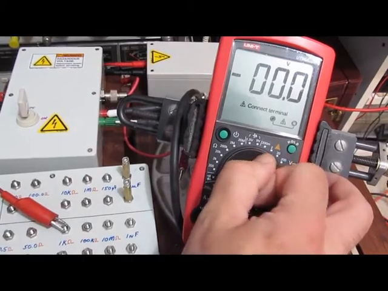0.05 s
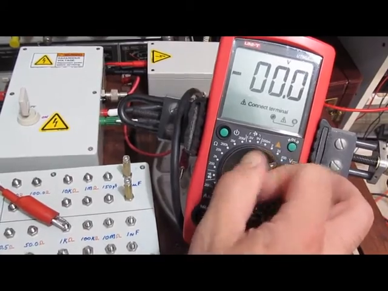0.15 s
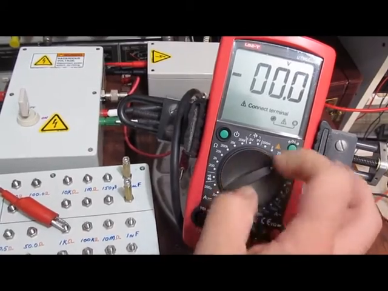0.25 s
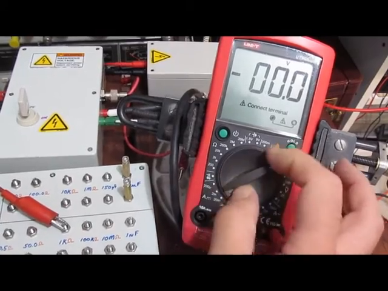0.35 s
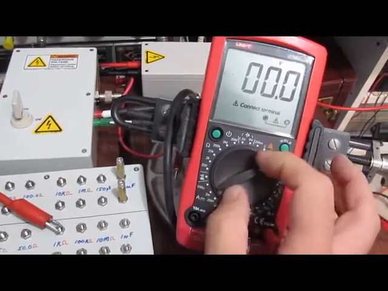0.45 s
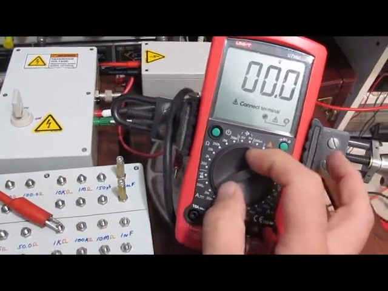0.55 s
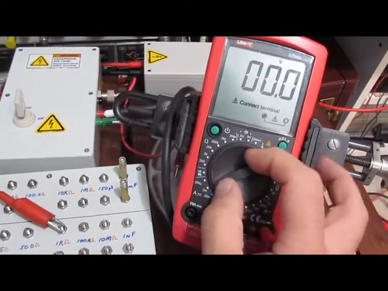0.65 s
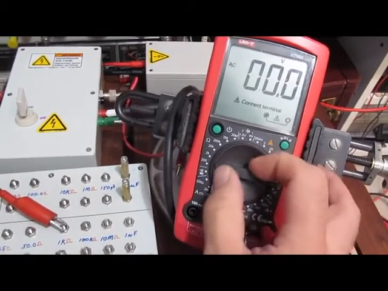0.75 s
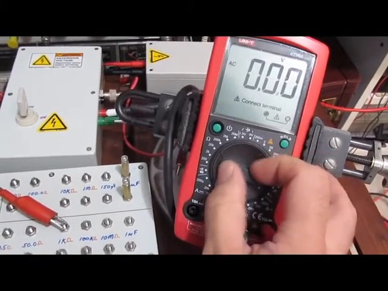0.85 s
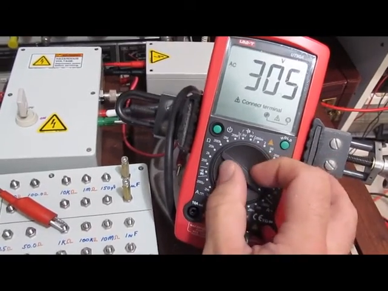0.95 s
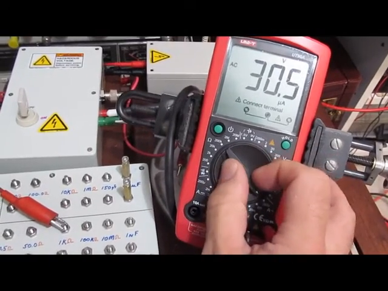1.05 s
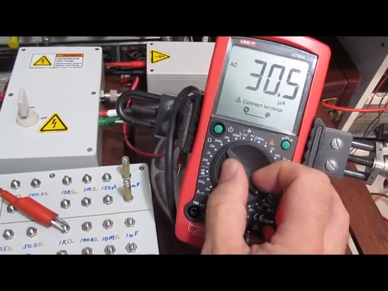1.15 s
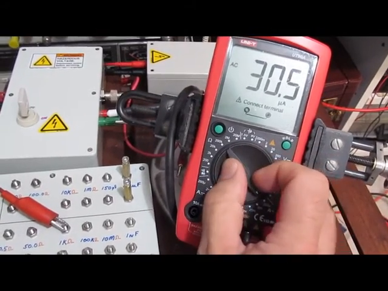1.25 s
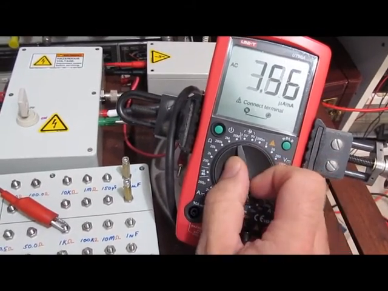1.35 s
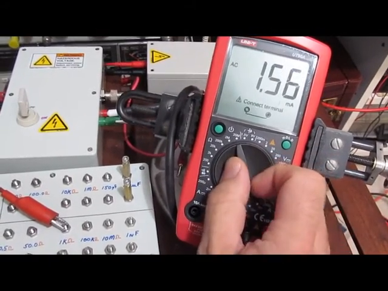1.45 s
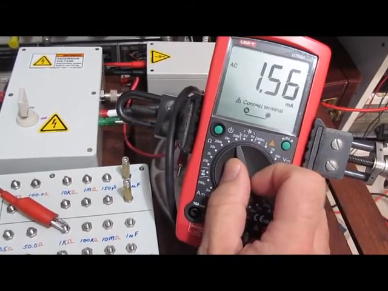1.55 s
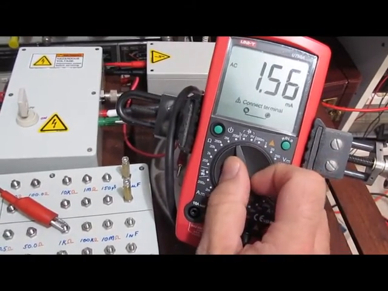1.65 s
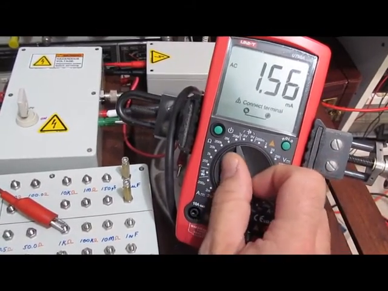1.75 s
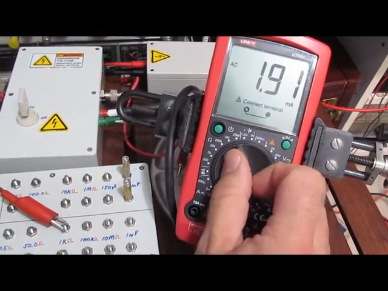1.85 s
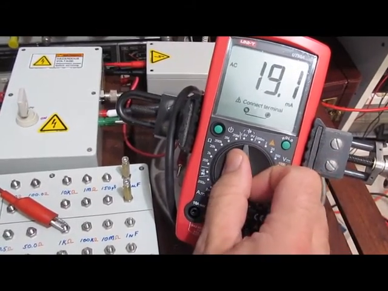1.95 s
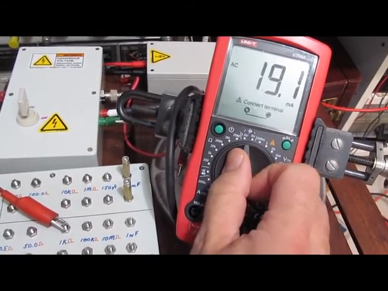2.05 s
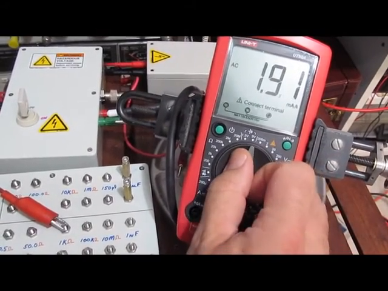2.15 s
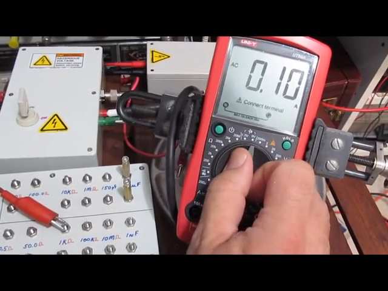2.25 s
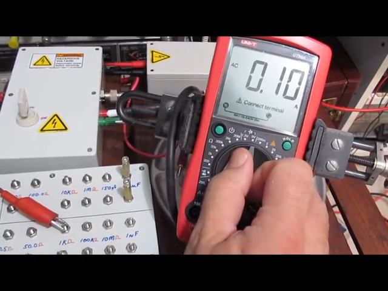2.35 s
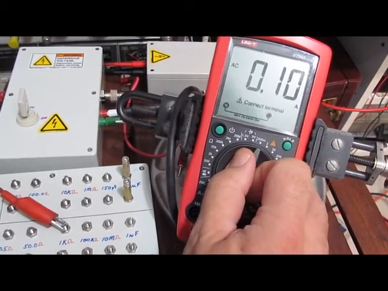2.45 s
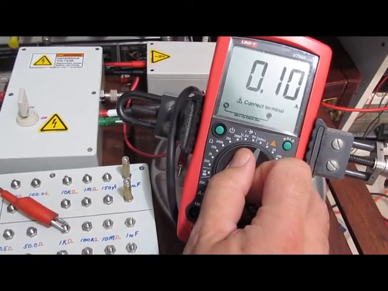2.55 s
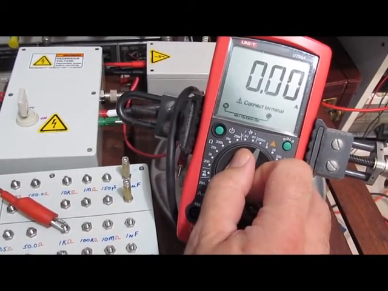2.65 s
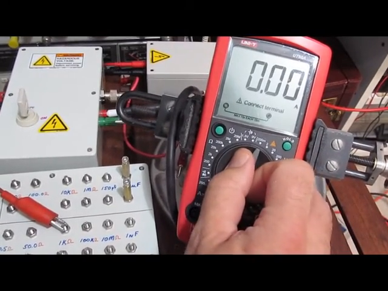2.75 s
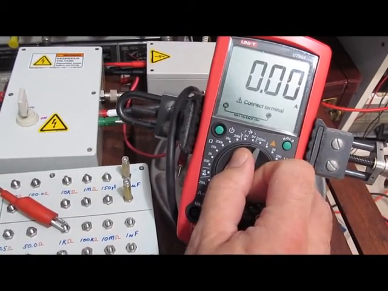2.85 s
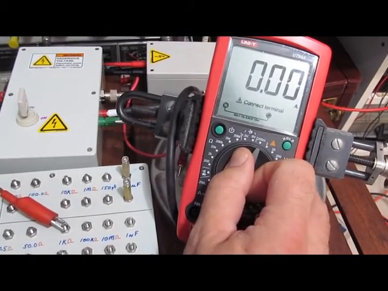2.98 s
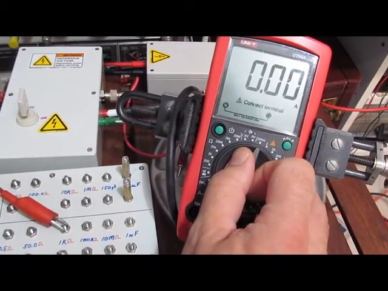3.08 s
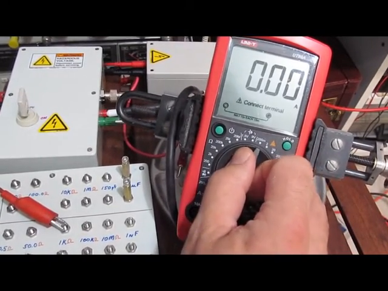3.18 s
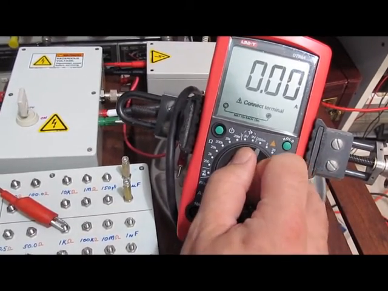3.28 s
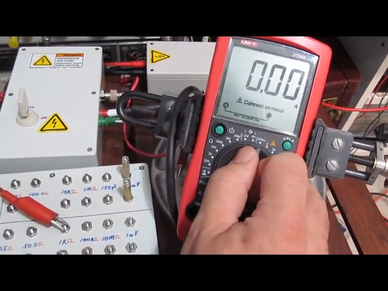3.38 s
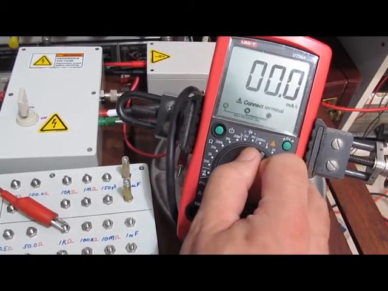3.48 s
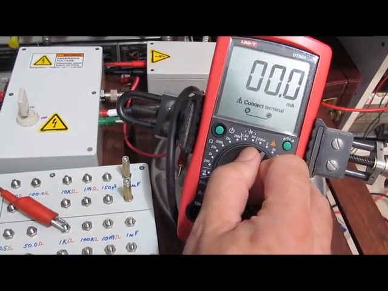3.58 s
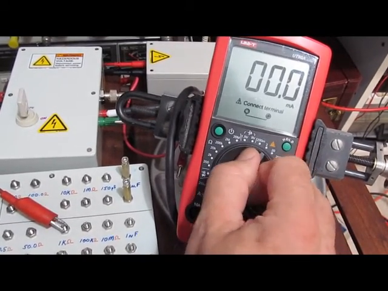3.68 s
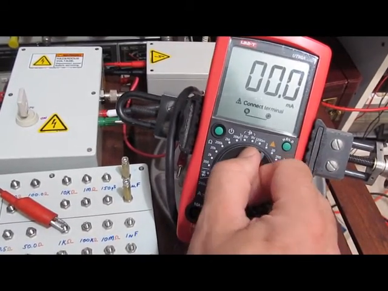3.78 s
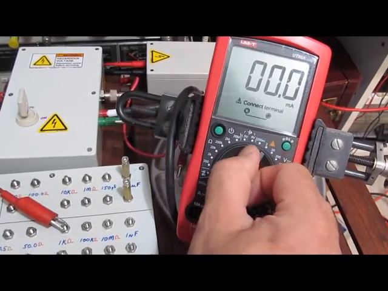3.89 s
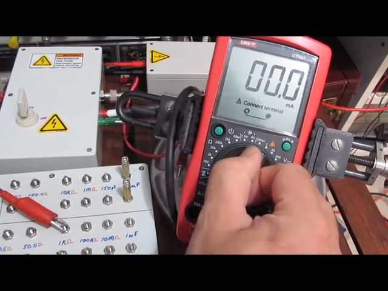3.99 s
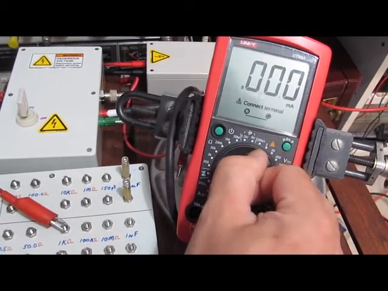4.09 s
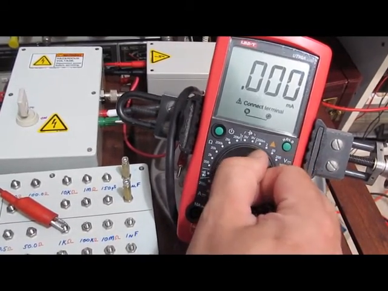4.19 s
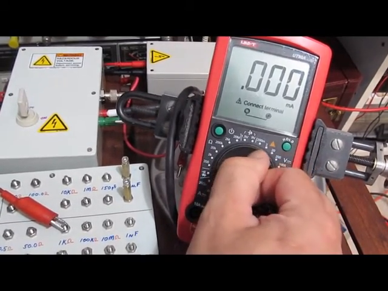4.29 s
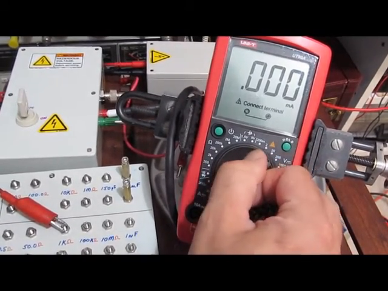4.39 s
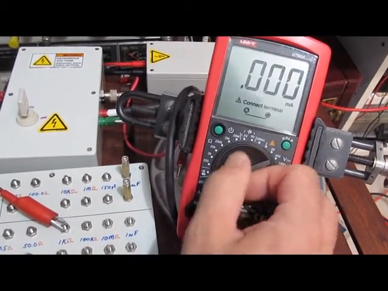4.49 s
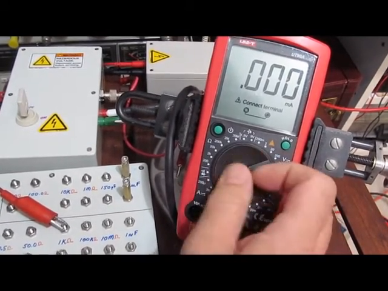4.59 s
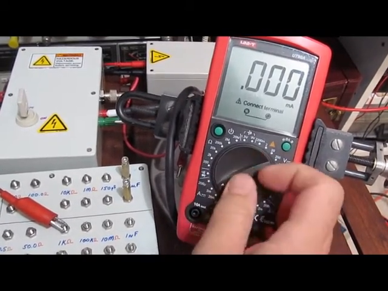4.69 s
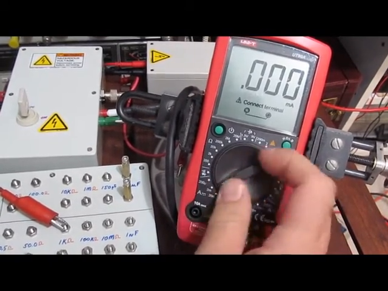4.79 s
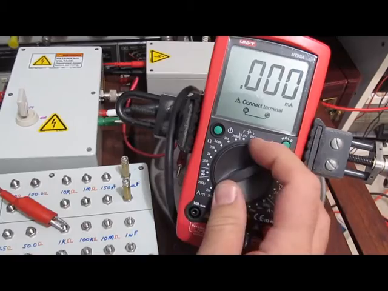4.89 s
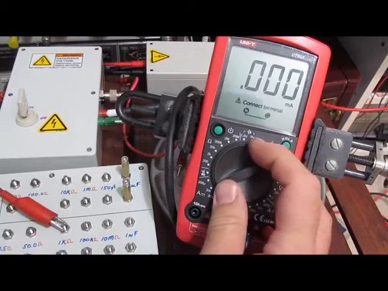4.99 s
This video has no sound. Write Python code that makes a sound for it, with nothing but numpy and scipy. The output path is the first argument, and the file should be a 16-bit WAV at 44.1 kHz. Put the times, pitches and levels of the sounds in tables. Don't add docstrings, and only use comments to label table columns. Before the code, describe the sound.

Sharp, hard plastic clicks as a hand turns a meter's rotary selector through its detents, unevenly spaced, over a faint steady fan hum.

```python
import sys
import numpy as np
from scipy import signal
from scipy.fft import rfft, irfft, next_fast_len
from scipy.io import wavfile
from scipy.ndimage import uniform_filter1d

SR = 44100
rng = np.random.default_rng(int(sys.argv[2]) if len(sys.argv) > 2 else 0)


def unload_wav(signal):
    wavfile.write(
        sys.argv[1],
        SR,
        np.round(np.clip(np.atleast_2d(signal).T, -1, 1) * 32767).astype(np.int16),
    )


def level_to_linear(level):
    exponent = np.asarray(level, float) / 20
    return 10 ** exponent


N = 221818

# blow in seconds, blow level in dB, main ring in Hz,
# gap to the first rebound in seconds, case rattle under the ring in dB.
DETENTS = [(.0033, -2.5, 4277, .0017, -17.5), (0.7555, -2, 4562, .0009, -11.5),
           (0.7612, -8.5, 4400, .0012, -11), (.7710, -7.5, 4138, 0.0014, -13),
           (.9180, -6.5, 4283, 0.0014, -10), (0.9465, -9, 5620, .0014, -7),
           (1.1155, -4, 4581, .0016, -10.5), (1.3683, -2, 3990, .0010, -12.5),
           (1.3961, -10.5, 5086, .0013, -8), (1.9541, -1.5, 4180, 0.00083, -15),
           (2.1880, -3, 4030, 0.001, -12.5), (2.5258, -0.5, 4150, .0010, -16.5),
           (3.5032, -2, 4330, .0010, -18.5), (4.0893, 0.5, 4453, .0010, -22.5),
           (4.1749, -12, 4272, 0.0014, -24), (4.1789, -14.5, 4272, 0.0011, -25.5)]
USUAL_RATTLE_DB = -13
RING_S = 0.06


def shape(x, points):
    hz, db = np.transpose(points)
    size = next_fast_len(x.shape[-1], real=True)
    log_hz = np.log(np.arange(size // 2 + 1) * SR / size + 1)
    gain = level_to_linear(np.interp(log_hz, np.log(hz), db))
    return irfft(rfft(x, size) * gain, size)[..., :x.shape[-1]]


def walk(rate):
    hold = int(SR / rate)
    steps = np.repeat(rng.standard_normal(N // hold + 1), hold)
    return 1.3 * uniform_filter1d(uniform_filter1d(steps, hold), hold)[:N]


def ring(hz, t60, db, late=0., push=0.00017):
    t = np.arange(int(SR * RING_S))[:, None] / SR
    fade = 1000. ** (-t / np.maximum(t60, .002))
    onset = 1 - np.exp(-(t / push) ** 2)
    return np.sum(level_to_linear(db) * np.sin(2 * np.pi * hz * (t + late)) * fade * onset, axis=1)


def add(out, s, sound):
    i = max(int(s * SR), 0)
    out[i:i + len(sound)] += sound[:N - i]


def contacts(s, db, gap, luck):
    k = np.arange(len(luck))
    rebound_s = s + gap * np.cumsum(1.15 ** k)
    rebound_db = db - 2.5 - 5.5 * k + 0.5 * luck
    tick = (s - 0.0017, db - 16)
    return [tick, (s, db), *zip(rebound_s, rebound_db)]


def dial():
    # Hz, t60 in seconds, dB.
    knock_modes = [(134.26, 0.021, -7.5), (228, .03, -6), (430, 0.014, -6.5), (620, 0.026, -2),
                   (907.2, .015, 1.5), (1000, 0.013, 0.5)]
    body_modes = [(1416, 0.011, -9), (1536, .01, -6.5), (1900, 0.0039, -5.5), (2042, 0.011, -2.5),
                  (2450, 0.009, -6.5), (2920, 0.0062, 5.5), (3350, 0.0021, 10.5)]
    edge_modes = [(4710, .006, 1), (5660, 0.0042, -2.5), (6320, 0.0069, -2), (7160, 0.0032, -2.5),
                  (6570, 0.004, -8), (7640, .006, -6.5), (8340, 0.0086, -4), (9180, .006, -2.5),
                  (10000, 0.003, -2), (10800, .005, -6), (11500, 0.003, -6)]
    # lower Hz, lower dB, upper Hz, upper dB, extra body level in dB.
    side_rings = [(3122, -4, 4700, -3.5, -0.5), (1460, -5.5, 2200, -6, 2.5), (2492, -3.5, 6200, -2, 0),
                  (2583, -12.5, 5800, -8.5, -5.5), (2770, -3.5, 5556, -4, 0), (2800, 3.5, 3800, 2.5, -4),
                  (3100, -14, 4200, -5, -2.5), (3040, -6.5, 6500, -5.5, -6), (3154, 3.5, 1400, -7, -2.5),
                  (3290, -11.5, 6100, -8.5, -1.5), (3148, -6, 4300, -4, -6.5), (2700, -7, 4700, -6.5, -5),
                  (3316, -1.5, 3900, -15, -3.5), (3460, -4.5, 2900, -13.5, -1),
                  (3130, -16, 4654, -2.5, -7.5), (3300, -13.5, 3900, -8, 3.5)]
    detune, scatter_db = 0.02, 1.0
    crack_db, crack_s = -0.5, 0.0023
    side_db, side_ring_db = -13, -4.5
    light_knock_db = -8.5
    slip = 0.85
    rebounds = 4
    hz, t60, db = np.transpose(knock_modes + body_modes + edge_modes)
    sizes = [len(knock_modes), len(body_modes), len(edge_modes)]
    push = np.repeat([.0015, .0004, .0003], sizes)
    damp = np.array([1, .55, .65])
    follows = np.array([.9, 0.85, 1])
    t = np.arange(int(SR * RING_S)) / SR
    crack_fade = t / crack_s * np.exp(-2.2 * t / crack_s)
    chance = rng.standard_normal((len(DETENTS), rebounds + 2, 2, 3, len(hz)))
    grit = rng.standard_normal((len(DETENTS), rebounds + 2, 2, len(t)))
    out = np.zeros((7, N))
    for detent, sides, spots, grains in zip(DETENTS, side_rings, chance, grit):
        start, blow_db, main_hz, gap, rattle_db = detent
        lower_hz, lower_db, upper_hz, upper_db, body_db = sides
        extra_rattle = rattle_db - USUAL_RATTLE_DB
        rings_hz = np.array([main_hz, lower_hz, upper_hz])
        rings_db = np.array([-1.5, lower_db, upper_db])
        rings_t60 = 0.0075 * (1 + 0.0137 * extra_rattle)
        parts_db = np.array([-26.5, -14.5 + body_db, -9]) + follows * extra_rattle
        hits = contacts(start, blow_db, gap, spots[2:, 1, 0, 0])
        for (s, hit_db), ports, noise in zip(hits, spots, grains):
            late = s - start + slip / damp * ports[0, 2, :3] / (2 * np.pi * rings_hz)
            lighter_db = [light_knock_db * (s != start), 0, 0]
            for k, (strength, tuning, sign) in enumerate(ports):
                modes_db = db + scatter_db * strength + np.repeat(parts_db + lighter_db, sizes)
                modes_hz = hz * (1 + detune * tuning)
                case = ring(modes_hz * np.sign(sign), t60, modes_db, push=push)
                quarter_turn = k / (4 * rings_hz)
                main = ring(rings_hz, rings_t60 * damp, rings_db + side_ring_db * k, late=late + quarter_turn)
                crack = level_to_linear(parts_db[2] + crack_db) * np.diff(noise[k], prepend=0) * crack_fade
                add(out[k], s, level_to_linear(hit_db + k * side_db) * (case + crack + main))
            if s == start:
                around_t60 = rings_t60 * 1.2 * np.sqrt(damp)
                around_db = rings_db + [0, -4, 0]
                around = [ring(*mode) for mode in zip(rings_hz, around_t60, around_db)]
                case = ring(modes_hz * (-1) ** np.arange(len(hz)), t60, modes_db, push=push)
                around += [level_to_linear(1) * case, level_to_linear(3) * crack]
                for row, part in zip(out[2:], around):
                    add(row, s, level_to_linear(hit_db + 3.5) * part)
    return out


def climb():
    climb_db, rise_s = -30, 0.0026
    grind_colour = [(800, -19.5), (2500, -3.5), (4300, 0.0), (9000, -7.5), (13000, -12.0)]  # (Hz, dB)
    t = np.arange(-SR // 100, 0) / SR
    grit = shape(rng.standard_normal((len(DETENTS), len(t))), grind_colour)
    out = np.zeros(N)
    for (s, blow_db, *_), noise in zip(DETENTS[1:], grit[1:]):
        add(out, s + t[0], level_to_linear(blow_db + climb_db) * noise * np.exp(t / rise_s))
    return out


def fingers():
    # start in seconds, level in dB, case mode in Hz, scrape in dB, knock in dB.
    taps = [
        (0.106, -42.5, 790, -11, -20.5),
        (0.242, -23.5, 607, -14.5, -4.5),
        (0.255, -29.5, 598, -19, 4),
        (0.263, -39.5, 704, -9, -5.5),
        (0.421, -38, 916, -19.5, -0.5),
        (0.45, -38, 1200, -21, -3),
        (1.481, -51, 590, -13, 7.5),
        (4.64, -35, 657, -21, -0.5),
    ]
    # Hz, dB.
    scrape_colour = [(100, -18), (300, 2), (900, 13.5), (2400, -4), (4300, -5.5), (5200, -11.5),
                     (8500, -15.5), (12000, -30)]
    # start in seconds, level in dB, pitch in Hz.
    creaks = [(0.1396, -50, 4570), (0.174, -53, 4280), (0.243, -40, 4300), (0.2614, -41, 4380),
              (0.3614, -60, 3950), (0.638, -58, 3217), (1.481, -42, 4240), (1.8995, -55, 4280),
              (4.654, -59, 4220)]
    scrape_s, lag_s = .004, 0.0018
    t = np.arange(int(SR * RING_S)) / SR
    grit = shape(rng.standard_normal((len(taps), len(t))), scrape_colour)
    out = np.zeros(N)
    for (s, db, hz, scrape_db, knock_db), noise in zip(taps, grit):
        knock = ring(hz * np.array([1, 2.85]), 0.01665, knock_db + np.array([0, -14]))
        slide = t / scrape_s
        scrape = level_to_linear(scrape_db + 15.0) * noise * np.sqrt(slide) * np.exp(-slide)
        add(out, s + lag_s, level_to_linear(db) * (knock + scrape))
    for s, db, hz in creaks:
        add(out, s, ring(hz * np.array([1, 1.1]), .02, db + np.array([-3, -9])))
    return out


def bench_echoes(mid):
    # delay in seconds, level in dB.
    echo_paths = [(.0105, -25), (.0225, -34)]
    return sum(level_to_linear(db) * np.roll(mid, int(s * SR)) for s, db in echo_paths)


def room(parts):
    # centre in Hz, t60 in seconds, level in dB.
    room_bands = [(537.6, 0.14, -45), (1200, 0.36, -45), (2100, 0.18, -38.5), (3100, 0.26, -48.5),
                  (4500, 0.26, -48.5), (6270, 0.22, -46), (9004, 0.13, -42), (12960, 0.15, -41)]
    build_s, wide = 0.0037, 0.73
    t = np.arange(SR // 2) / SR
    tail = 0
    for hz, t60, db in room_bands:
        band_pass = [(hz / 1.7, -30), (hz / 1.15, 0), (hz * 1.15, 0), (hz * 1.7, -30)]
        band = shape(rng.standard_normal((2, len(parts), len(t))), band_pass)
        tail = tail + level_to_linear(db) * band * 1000. ** (-t / t60)
    tail = tail * (1 - np.exp(-(t / build_s) ** 2))
    pair = np.array([tail[0] + wide * tail[1], tail[0] - wide * tail[1]])
    return signal.fftconvolve(parts[None], pair, axes=2).sum(axis=1)[:, :N]


def duck():
    recover_s = .6
    t = np.arange(N) / SR
    drops_db = [(8.5 + .4 * db) * np.exp(-np.abs(t - s) / recover_s) * (t > s) for s, db, *_ in DETENTS]
    return -49 - 1.03 * t - np.max(drops_db, axis=0)


def air():
    # Hz, level in dB per Hz.
    air_colour = [(12, -51), (20, -22.5), (91, -3), (107, 0.5), (123, -16.5), (145, -8.5), (277, -2.5),
                  (373, -10), (476, -8.5), (696, -12), (1070, -17), (1570, -18), (2290, -22.5), (8660, -39),
                  (13000, -59)]
    # Hz, side minus mid in dB.
    air_width = [(60, -5), (110, -9.5), (200, -15), (360, -15), (660, -10.5), (1200, -4.5), (2180, -3),
                 (3960, 0.5), (7210, -1), (13100, 6)]
    # Hz, level in dB, unsteadiness from 0 to 1.
    motor_tones = [(478.2, -60.5, 0.4), (1101, -66, 0.14), (1279, -69.5, .2)]
    mid, side = shape(rng.standard_normal((2, N)), air_colour)
    side = shape(side, air_width)
    scale = np.std(shape(mid, [(140, -60), (150, 0), (1500, 0), (1600, -60)]))
    out = 0
    for hz in 25 * 2. ** np.arange(10):
        octave = [(hz / 2, -40), (hz / 1.5, -3), (hz, 0), (hz * 1.33, -3), (hz * 2, -40)]
        out = out + shape(np.array([mid + side, mid - side]), octave)
    t = np.arange(N) / SR
    for hz, tone_db, loose in motor_tones:
        port_lag = np.array([[0], [hz / 1500]])
        phase = 2 * np.pi * hz * t + loose * 3 * walk(3.5) + port_lag
        tone_level = level_to_linear(tone_db + 61.5 + 5.6 * loose * walk(16))
        out = out + scale * tone_level * np.sin(phase)
    return out / scale * level_to_linear(duck() - 4.5)


def scene():
    mid, side, *around = dial()
    soft = fingers() + climb()
    mid = mid + soft
    reflections = bench_echoes(mid) + room(np.array(around + [soft]))
    return np.array([mid + side, mid - side]) + reflections + air()


def band_limit(x):
    return signal.sosfilt(signal.butter(12, 13710, fs=SR, output="sos"), x)


def record(dry):
    wide_spans = [(1.39, 1.52), (2.52, 2.68), (2.88, 5.1)]
    # Hz, threshold over the usual level in dB.
    gate_points = [(3000, -21), (5750, -11), (5850, 0), (5950, 13.5), (6050, -4.5), (7400, -6.5), (7700, 5),
                   (7900, 4), (8100, 0.5), (9200, 1), (10000, -3), (11000, 7)]
    top_cut = signal.ellip(10, .5, 55, 12800, fs=SR, output="sos")
    x = signal.sosfilt(top_cut, np.clip(dry, -.97, .97))
    hz, t, (mid, side) = signal.stft([x[0] + x[1], x[0] - x[1]], SR, nperseg=1024)
    clicks = [(s - .005, s + 0.026) for s, *_ in DETENTS]
    wide = sum((t >= a) & (t < b) for a, b in wide_spans + clicks) > 0
    folded = (hz[:, None] > 4050) & ~wide
    power = uniform_filter1d(np.abs([mid, side]) ** 2, size=3, axis=2)
    usual = uniform_filter1d(np.median(power[0], axis=1), size=9)
    threshold_db = np.interp(hz, *np.transpose(gate_points), left=-90)
    is_open = power > (usual * level_to_linear(2 * threshold_db))[:, None]
    mid_power, side_power = uniform_filter1d(power, size=9, axis=1)
    lift = np.sqrt(1 + side_power / mid_power)
    pair = np.array([mid * np.where(folded, lift, 1), side * ~folded]) * is_open
    mid, side = signal.istft(pair, SR, nperseg=1024)[1][:, :N] / 2
    return band_limit(np.clip([mid + side, mid - side], -1, 1))


dry = scene()
out = record(dry)
unload_wav(out)
```